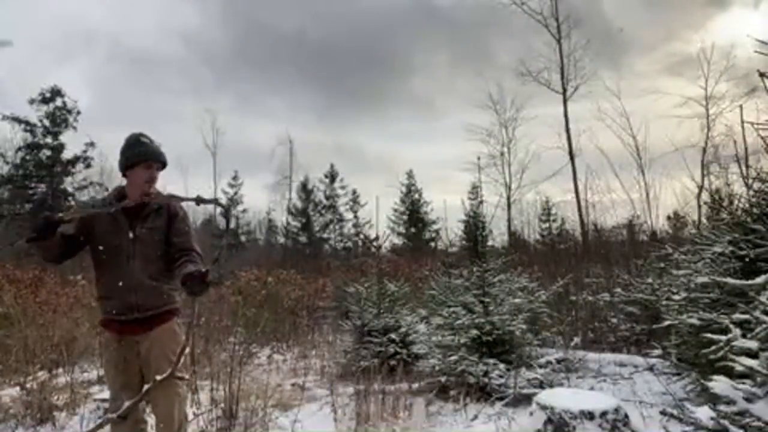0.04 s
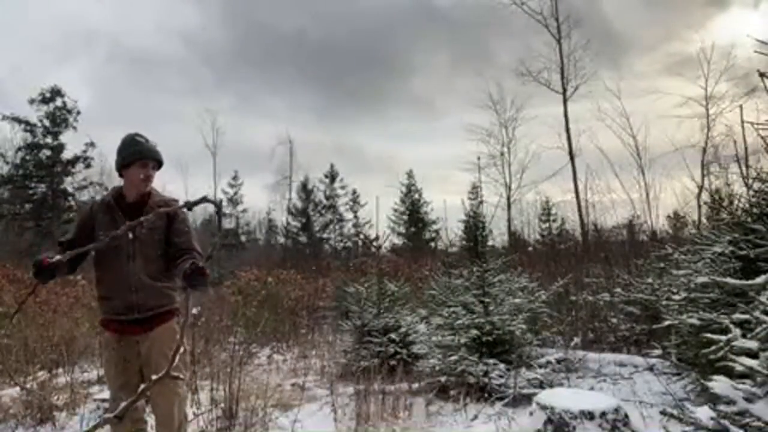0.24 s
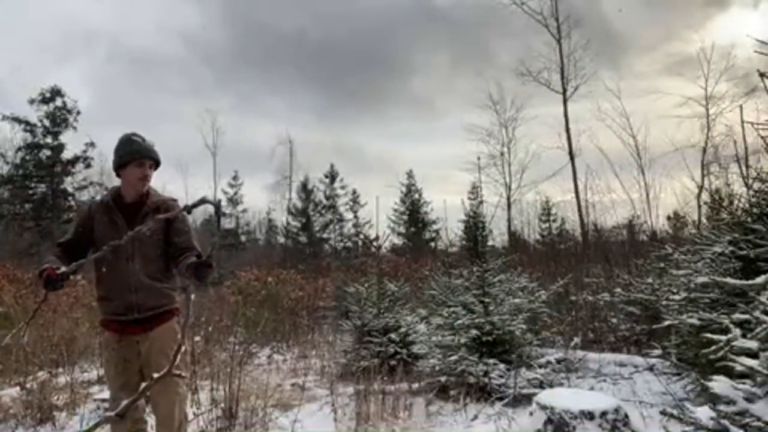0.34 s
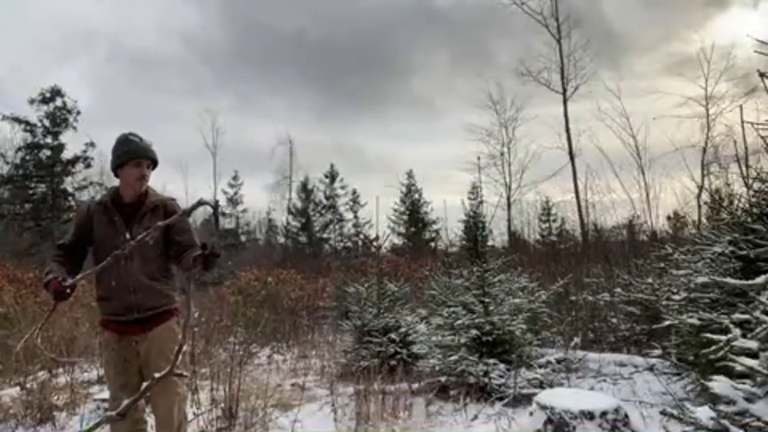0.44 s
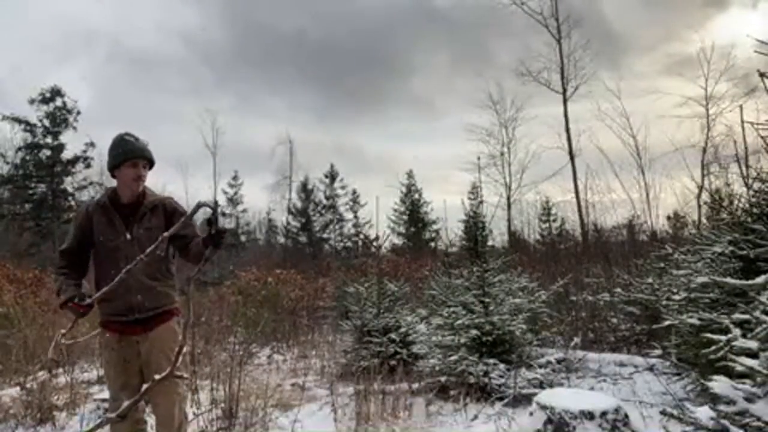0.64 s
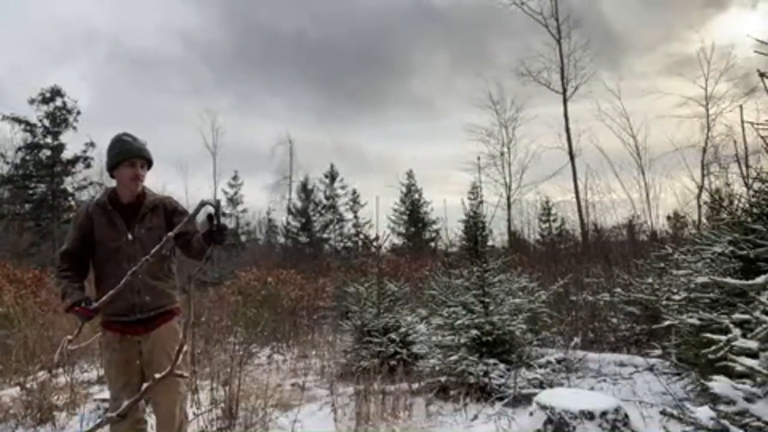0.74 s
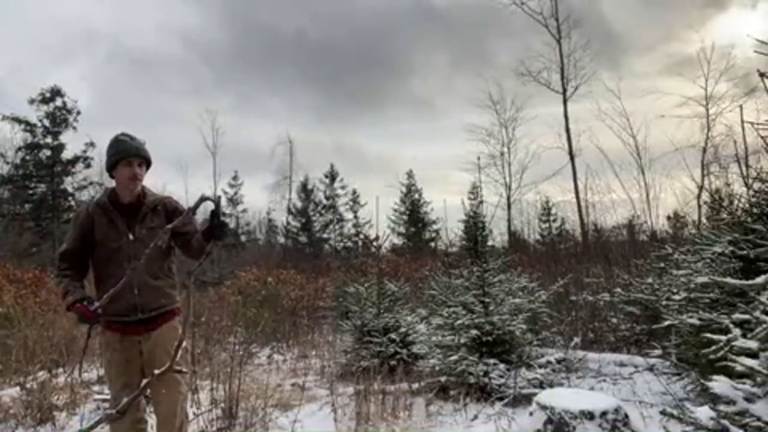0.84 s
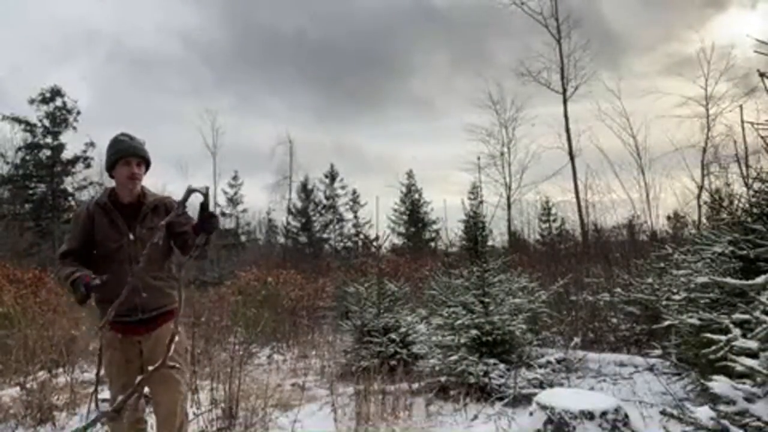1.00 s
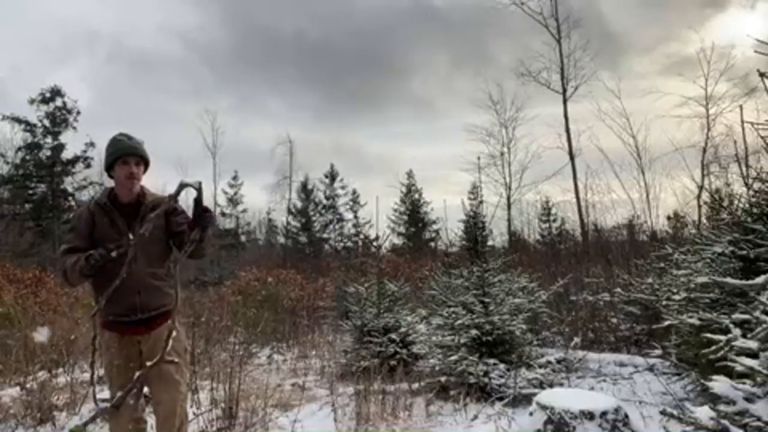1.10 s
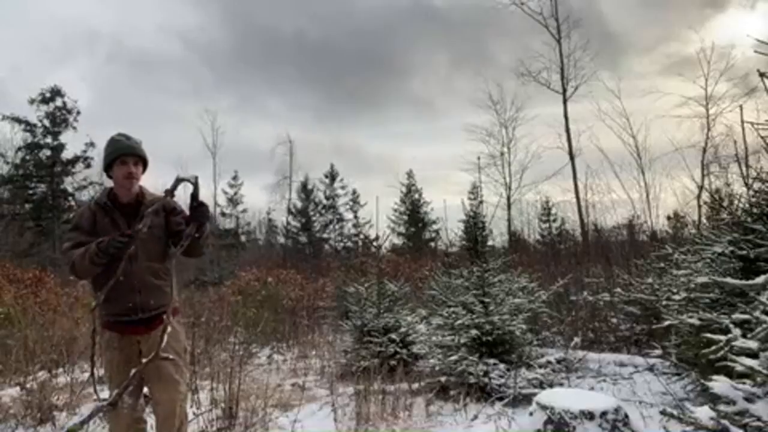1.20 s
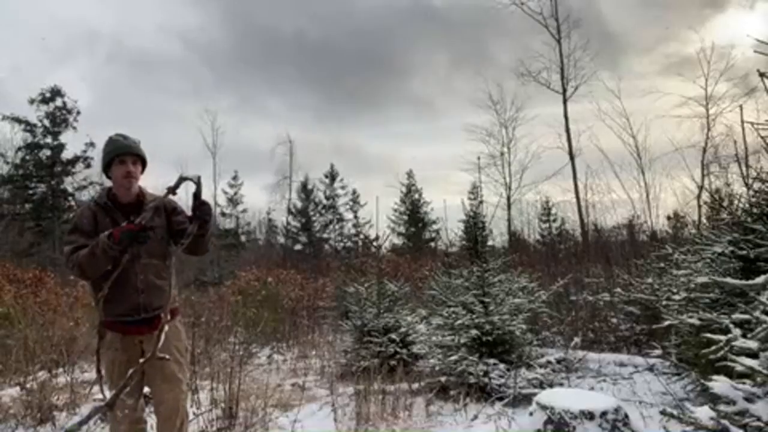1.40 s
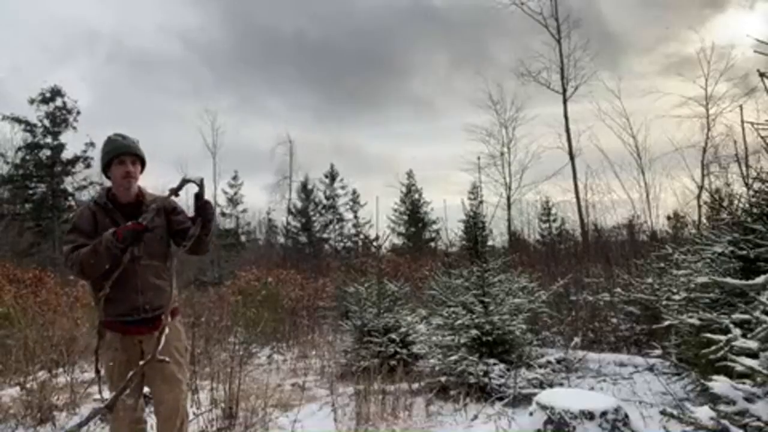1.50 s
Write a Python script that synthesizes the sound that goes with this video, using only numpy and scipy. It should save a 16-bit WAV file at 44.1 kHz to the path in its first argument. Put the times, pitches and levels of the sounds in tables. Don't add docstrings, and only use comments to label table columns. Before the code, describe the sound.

One loud, bright crack of breaking wood in a snowy clearing, then faint glove rustle and ticking

```python
import sys
import numpy as np
from scipy import signal
from scipy.fft import rfft, irfft, next_fast_len
from scipy.io import wavfile
from scipy.ndimage import uniform_filter1d

SR = 44100
rng = np.random.default_rng(int(sys.argv[2]) if len(sys.argv) > 2 else 0)


def voltage_ratio(level):
    return 10 ** (np.asarray(level, float) / 20)


def dump_mix(stems):
    frames = np.atleast_2d(stems).T
    limited = np.clip(frames, -1, 1)
    pcm = np.round(limited * 32767).astype(np.int16)
    wavfile.write(sys.argv[1], SR, pcm)


N = 68355


def level(x, db):
    return x * voltage_ratio(db) / np.sqrt(np.mean(x ** 2))


def colour(x, table):
    hz, db = np.array(table).T
    size = next_fast_len(N)
    f = np.arange(size // 2 + 1) * SR / size + 1
    gain = voltage_ratio(np.interp(np.log(f), np.log(hz), db))
    return irfft(rfft(x, size) * gain, size)[:N]


def curve(table, axis):
    rows = np.array(table)
    return np.interp(np.arange(N) / SR, rows[:, 0], rows[:, axis])


def band(x, hz, width_hz):
    return signal.lfilter(*signal.iirpeak(min(hz, .45 * SR), hz / width_hz, fs=SR), x)


def band_twice(x, hz, width_hz):
    return band(band(x, hz, width_hz), hz, width_hz)


def walk(rate):
    k = int(SR / rate)
    steps = np.repeat(rng.standard_normal(N // k + 1), k)
    return 1.683 * uniform_filter1d(uniform_filter1d(steps, k), k)[:N]


def grit(rate, spread_db):
    grain_s = .0005
    starts = rng.random(N) < rate / SR
    size_db = spread_db * np.minimum(rng.exponential(size=N), 4)
    power = signal.lfilter([1], [1, -np.exp(-1 / (grain_s * SR))], starts * voltage_ratio(2 * size_db))
    return level(np.sqrt(power) * rng.standard_normal(N), 0)


def add(out, at_s, x):
    i = int(at_s * SR)
    out[i:i + len(x)] += x[:N - i]


def click(hz, width_hz, edge_db):
    t = np.arange(1024) / SR
    noise = rng.standard_normal(len(t))
    crumble = voltage_ratio(-18) * noise * np.exp(-t / .003)
    push = crumble + 0.38 * noise * np.exp(-t / 0.000204) + (t == 0)
    ring = band_twice(push, hz, 1.164 * width_hz)
    edge = band(push, 9560, 8200) / np.abs(push).max()
    return ring / np.abs(ring).max() + voltage_ratio(edge_db) * edge


# frequency in Hz, density in dB per Hz.
AIR_COLOUR = [(40, -28), (100, -6), (300, 2), (640, -1), (1500, 0.5), (3800, -5.5), (10000, -1.5),
              (16000, -7.5)]


def open_air():
    return level(colour(rng.standard_normal(N), AIR_COLOUR), -66)


# frequency in Hz, density in dB per Hz.
SWAY_TONE = [(30, -28.5), (60, -13), (100, -0.5), (200, -1), (350, -9), (600, -28.5), (1000, -37.5),
             (2000, -61)]
# time in seconds, level in dB.
SWAY_LEVEL = [
    (0, -62.5),
    (.07, -54.5),
    (.13, -64.5),
    (.36, -64),
    (.47, -74.5),
    (.9, -81),
    (1.15, -73),
    (1.36, -67.5),
    (1.47, -77.5),
    (1.55, -89.5),
]


def sway():
    rumble = level(colour(rng.standard_normal(N), SWAY_TONE), 0)
    return rumble * voltage_ratio(curve(SWAY_LEVEL, axis=1) + 2 * walk(29.83))


# time in seconds, rustle level in dB, low and mid boost (dullness) in dB.
HANDLING_MOVES = [(0, -58.5, 6.5), (.06, -56, -3), (.16, -46, -4.5), (.21, -55, -0.5), (.40, -75, 3),
                  (.50, -65.5, 0), (.62, -69.5, 0), (.685, -60.5, 0.5), (.72, -59, -18), (.83, -57.5, -12),
                  (.92, -56.5, -6.5), (1.08, -59.5, -7.5), (1.13, -64, -3.5), (1.19, -62.5, 3),
                  (1.25, -60.5, -1), (1.38, -58.5, 4.5), (1.47, -71.5, 4.5), (1.55, -62.5, 1.5)]
# frequency in Hz, density in dB per Hz.
RUSTLE_TONE = [(200, -15.5), (400, -1.5), (800, -5), (1600, -4), (3000, -4.5), (4700, -5), (9000, -9),
               (16000, -7.5)]


def rustle():
    flicker_db, dull_hz = 2.5, 1500
    dullness_db = curve(HANDLING_MOVES, axis=2)
    out = np.zeros(N)
    for hz in 400 * 2. ** np.arange(6):
        octave = band(colour(grit(2500, 2), RUSTLE_TONE), hz, 0.822 * hz)
        dull_db = dullness_db / (1 + (hz / dull_hz) ** 2)
        out += octave * voltage_ratio(flicker_db * walk(39.887) + dull_db)
    return level(out, 0) * voltage_ratio(curve(HANDLING_MOVES, axis=1))


# time in seconds, level in dB, ring in Hz, ring width in Hz,
# level of the sharp edge in dB.
TWIG_TICKS = [(.020, -44, 4000, 3000, -14), (.040, -48.5, 3530, 2000, -3.5), (.1191, -42, 4000, 1500, 2),
              (0.1208, -35, 3490, 910, 11.5), (.1212, -36.5, 4500, 900, -3.5),
              (.1229, -45, 3620, 700, 14.5), (.1250, -42, 4500, 1200, -7), (.170, -38.5, 4500, 900, 4.5),
              (.4321, -27.5, 3950, 5870, 5.5), (.4345, -36.5, 4500, 4000, 0.5),
              (.4574, -41, 1750, 2000, -5.5), (0.4623, -48.5, 1620, 1200, -5.5),
              (.471, -45.5, 8950, 5970, -8), (.511, -50, 5600, 3020, -7), (.632, -46.5, 1410, 906, -9.5),
              (.638, -46.5, 2800, 1200, -11.5), (.663, -47, 3730, 1200, -12.5),
              (.670, -52.5, 1004, 920, 8.5), (.857, -48, 2980, 3000, -10.5), (1.007, -48, 1970, 495, -20.5),
              (1.092, -55, 5000, 3000, -6), (1.142, -45, 3830, 2520, -5.5), (1.301, -50.5, 1066, 590, -10),
              (1.355, -47, 1396, 700, 9), (1.3574, -40, 3510, 900, 9.5), (1.3604, -36, 4120, 2600, -10.5),
              (1.398, -46, 2500, 2500, -5), (1.4032, -46.5, 1094, 700, -12), (1.3991, -40, 1223, 1090, -10),
              (1.422, -42.5, 3510, 4030, -12.5), (1.495, -54, 1420, 900, -11)]


def twigs():
    out = np.zeros(N)
    for at, db, hz, width_hz, edge_db in TWIG_TICKS:
        add(out, at, voltage_ratio(db) * click(hz, width_hz, edge_db))
    return out


# start in seconds, level in dB, start pitch in Hz, sweep time in seconds,
# 60 dB decay in seconds.
BENDING_WAVES = [
    (.020, -53, 901, 0.00666, 0.043),
    (0.063, -46, 441.8, 0.0188, 0.1304),
    (1.164, -43.5, 2989, 0.0004275, 0.0323),
]


def bends():
    out, t = np.zeros(N), np.arange(8192) / SR
    for at, db, hz, sweep, t60 in BENDING_WAVES:
        pitch = 40 + hz / (1 + t / sweep)
        swoop = np.sin(2 * np.pi * np.cumsum(pitch) / SR)
        add(out, at, voltage_ratio(db - 60 * t / t60) * (1 - np.exp(-t / 0.000373)) * swoop)
    return out


# centre in seconds, level in dB, pitch in Hz, length in seconds.
STICK_BUMPS = [(0.052, -52, 101, 0.0334), (0.09, -46.5, 124, 0.0222), (0.194, -61.5, 79.4, 0.046),
               (0.237, -52, 91.6, 0.06), (0.315, -64.5, 69.5, .04), (.35, -51.5, 136.6, 0.0173),
               (0.402, -56.5, 75.8, 0.065), (0.666, -68, 80.2, 0.035), (0.856, -67, 86.5, 0.0426),
               (1.181, -70.5, 74.6, 0.03), (1.180, -56, 153.5, 0.0147), (.13, -66, 70, 0.049),
               (.5, -66.5, 69.4, 0.051), (1.288, -69, 69.5, 0.036), (1.374, -58, 85.2, 0.0486),
               (1.427, -60, 85, 0.0375)]


def bumps():
    at, db, hz, length = np.array(STICK_BUMPS).T[:, :, None]
    u = np.arange(N) / SR - at
    swell = voltage_ratio(db) * np.exp(-(2.526 * u / length) ** 2)
    return (swell * np.sin(2 * np.pi * hz * u * (1 - 2 * u))).sum(axis=0)


# start in seconds, length in seconds, level in dB, centre in Hz,
# fall over the burst in dB (negative grows).
TEARING = [(0.054, 0.0244, -55, 596, 1), (0.227, 0.0176, -49, 4080, -14), (0.245, 0.0137, -31.5, 7010, -1),
           (0.254, 0.0139, -37.5, 5600, 7.5), (0.626, 0.0113, -53, 5960, 8.5),
           (0.928, 0.01224, -49.5, 8100, -1.5), (0.94, 0.062, -47, 6900, 8),
           (0.963, 0.0631, -57.5, 1095, 5), (1.126, 0.00785, -58.5, 4200, 1), (1.241, .018, -57.5, 4500, 2),
           (1.323, 0.0175, -59, 7000, -1), (0.674, 0.019, -62, 12030, 6.5)]


def tears():
    edge_s = .002
    out, t = np.zeros(N), np.arange(N) / SR
    for at, length, db, hz, fall_db in TEARING:
        u = t - at
        gate = np.clip(np.minimum(u, length + 2 * edge_s - u) / edge_s, 0, 1) ** 2
        fibres = level(band_twice(grit(4000, 2), hz, 1.83 * hz), db)
        out += fibres * gate * voltage_ratio(-fall_db * np.clip(u / length, 0, 1) + 0.86 * walk(300))
    return out


# time in seconds, level in dB, brightness in dB per octave.
CRACKS = [
    (0.2381, -27, 3),
    (0.2400, -23, 7),
    (0.2405, -5, 0),
    (0.2413, -19, 5),
    (0.2423, -24, 6),
    (0.2431, -23, 1),
    (.2438, -23, -2),
]
# frequency in Hz, level in dB, 60 dB decay in seconds.
WOOD_MODES = [(547.8, -24, 0.0126), (757, -23, 0.0204), (2054, -28.5, 0.0101), (3177, -1.5, 0.01204),
              (3619, -7.5, 0.00924), (4300, -8, 0.0134), (6293, -13.5, 0.0075), (6914, -8, 0.0079),
              (8779, -5.5, 0.00503), (9398, -11, 0.0057), (11100, -22, 0.0037), (12820, -20.5, 0.00804),
              (15000, -13, 0.0048)]


def snap():
    scatter_db, detune = 1.5, .015
    out = np.zeros(N)
    hz, mode_db, t60 = np.array(WOOD_MODES).T[:, :, None]
    for at, db, bright_db in CRACKS:
        t = np.maximum(np.arange(2048) / SR - at * SR % 1 / SR, 0)
        uneven_db = scatter_db * rng.standard_normal(hz.shape)
        tilt_db = bright_db * np.log2(hz / hz[3])
        gain = voltage_ratio(mode_db + uneven_db + tilt_db - 60 * t / t60)
        pitch = hz * (1 + detune * rng.standard_normal(hz.shape))
        rings = gain * np.sin(2 * np.pi * pitch * t)
        add(out, at, voltage_ratio(db) * rings.sum(axis=0) * (1 - np.exp(-t / .0001)))
    return signal.sosfilt(signal.butter(3, 330, "high", fs=SR, output="sos"), out)


def tree_echo():
    t60_s, rise_s = 0.3552, 0.0172
    t = np.maximum(np.arange(N) / SR - CRACKS[2][0], 0)
    hiss = level(band(grit(4600, 2.78), 4500, 8830), -36.5)
    return hiss * voltage_ratio(-60 * t / t60_s) * (1 - np.exp(-t / rise_s))


# time in seconds, level in dB, ring in Hz.
BARK_CRUMBS = [(0.255, -19.5, 6460), (0.2619, -37.5, 3500), (.2730, -26, 5540), (0.501, -47.5, 9860),
               (0.586, -51, 9000), (0.6405, -52.5, 840), (.932, -48, 7000), (.942, -45.5, 5460),
               (.964, -39, 6000), (0.971, -41.5, 4800), (0.9786, -39, 5000), (.987, -43, 4500),
               (0.998, -50, 9100), (1.012, -36.5, 13600), (1.018, -64.5, 1000), (1.296, -42, 11000),
               (1.375, -44, 3320), (1.37, -47, 3600), (.2585, -23.5, 4800), (0.2646, -32, 4300),
               (1.408, -53.5, 1007), (1.452, -54, 1900), (.938, -46, 1713)]


def bark():
    out = np.zeros(N)
    for at, db, hz in BARK_CRUMBS:
        add(out, at, voltage_ratio(db) * click(hz, 0.61 * hz, -14))
    return out


def slide():
    centre_s, length_s = 0.801, 0.099
    swell = np.exp(-((np.arange(N) / SR - centre_s) / length_s) ** 4)
    hiss = band_twice(grit(2500, 2), 4350, 3020)
    return level(hiss, -66.5) * swell * voltage_ratio(1.2 * walk(40.26))


def scene():
    background = open_air() + sway()
    hands = rustle() + slide()
    stick = twigs() + bends() + bumps() + tears() + bark()
    return (background + hands + stick + snap() + tree_echo())[None]


def roll_off(x):
    return signal.sosfilt(signal.butter(12, 16830, fs=SR, output="sos"), x)


def record(dry):
    top_hz, hold = 15700, int(.003 * SR)
    cut = signal.sosfilt(signal.butter(3, 50.4, "high", fs=SR, output="sos"), dry)
    top = signal.sosfilt(signal.ellip(6, .2, 40, top_hz, "high", fs=SR, output="sos"), cut)
    sharp = uniform_filter1d(np.abs(top), hold) > voltage_ratio(-62)
    body = signal.sosfilt(signal.ellip(12, .2, 60, top_hz, fs=SR, output="sos"), cut)
    mix = body + voltage_ratio(-11) * top * uniform_filter1d(1. * sharp, hold)
    return roll_off(mix - .0003)


dry = scene()
out = record(dry)
dump_mix(out)
```